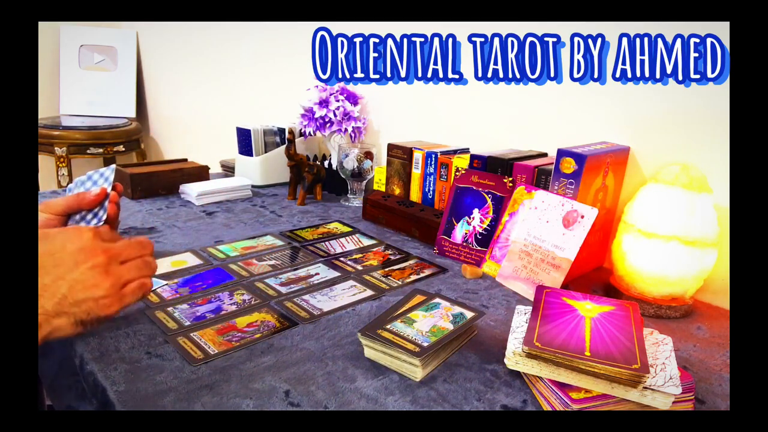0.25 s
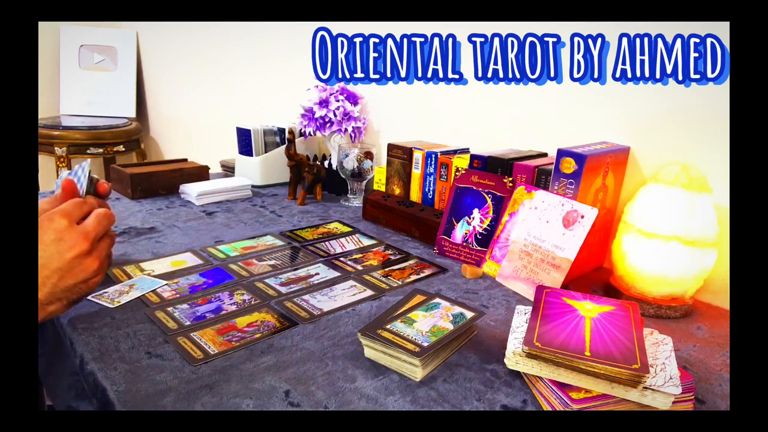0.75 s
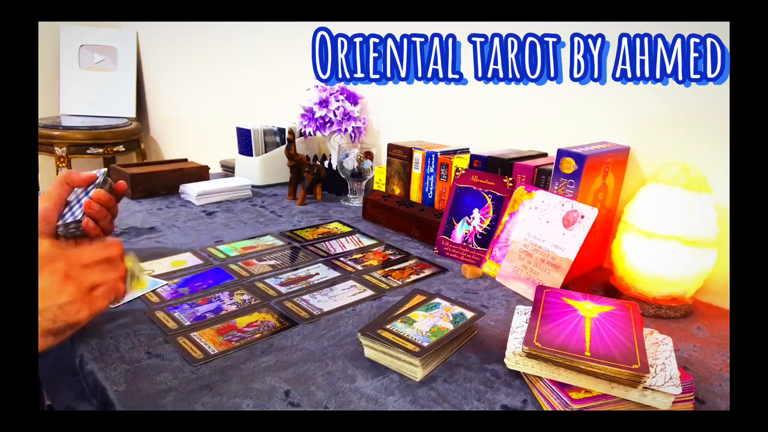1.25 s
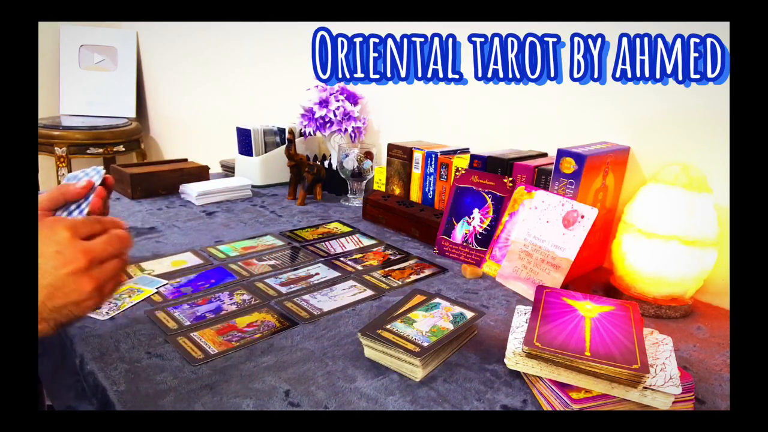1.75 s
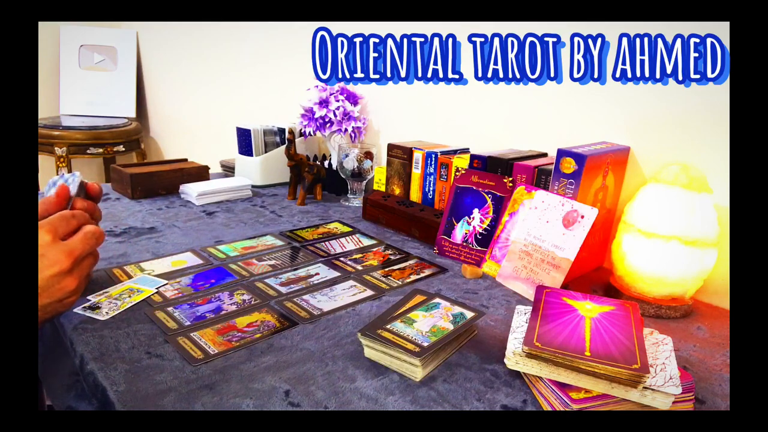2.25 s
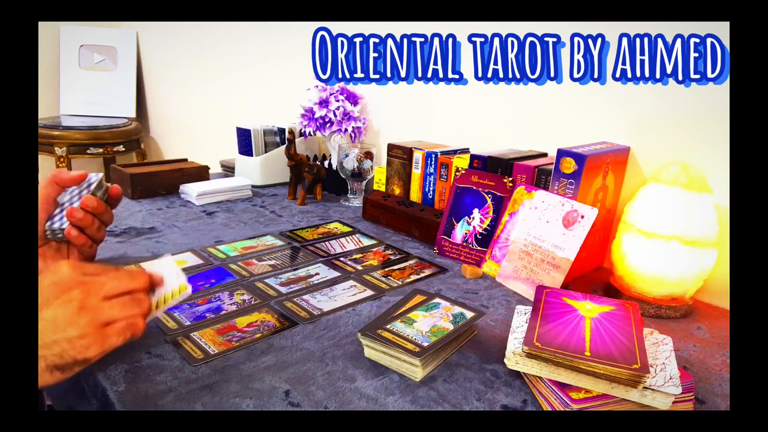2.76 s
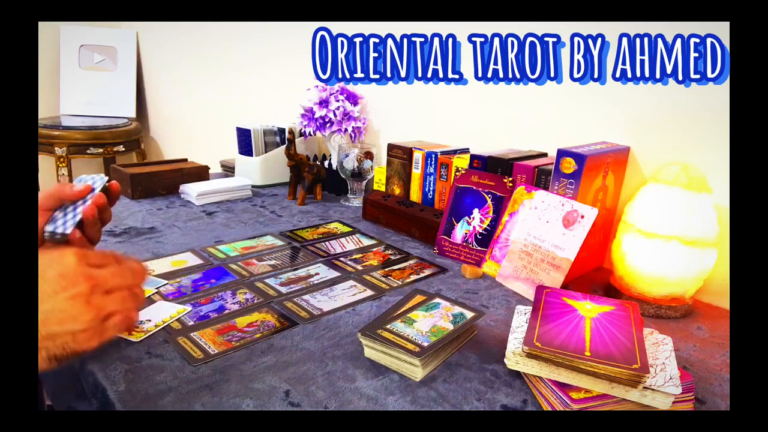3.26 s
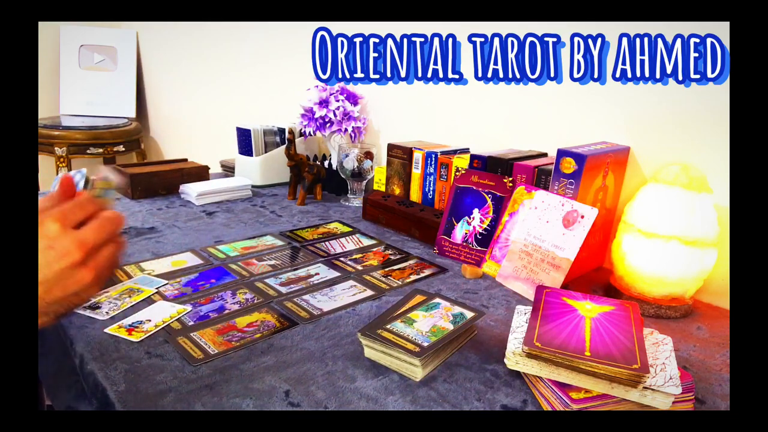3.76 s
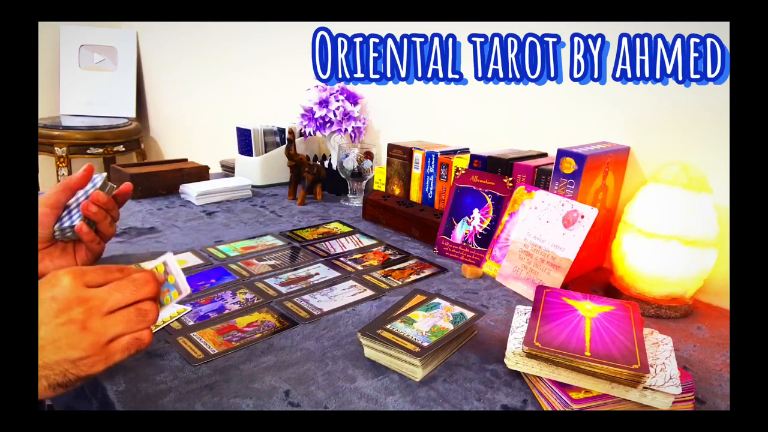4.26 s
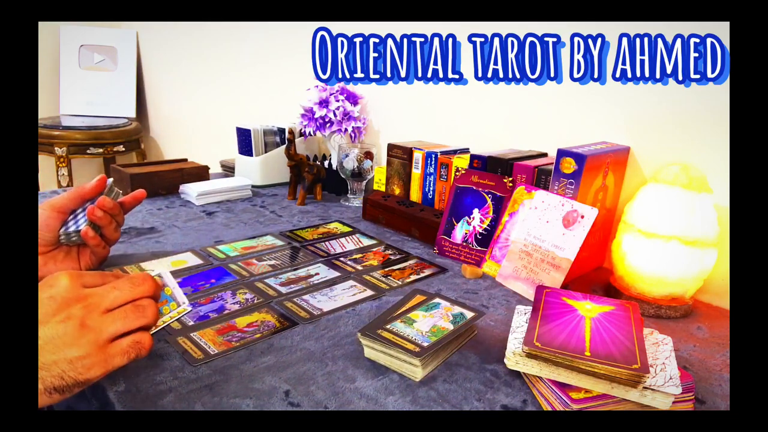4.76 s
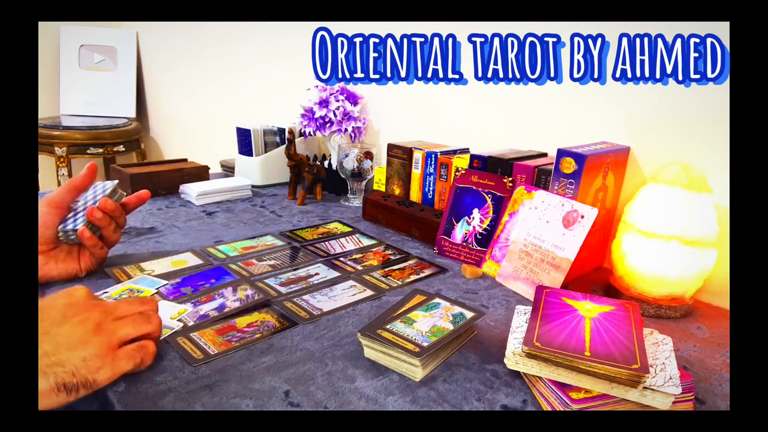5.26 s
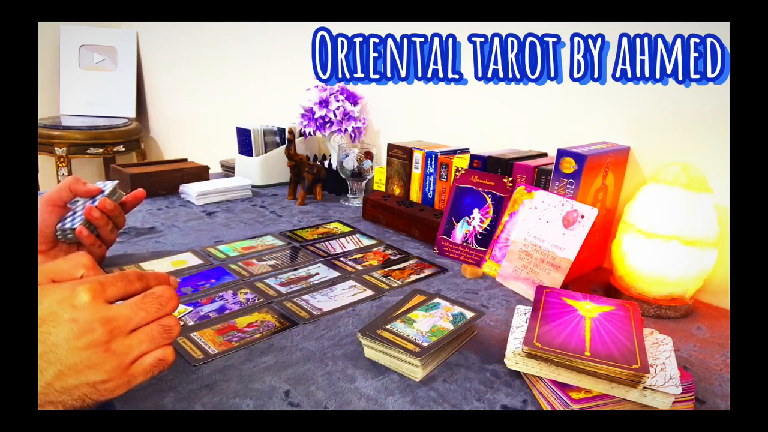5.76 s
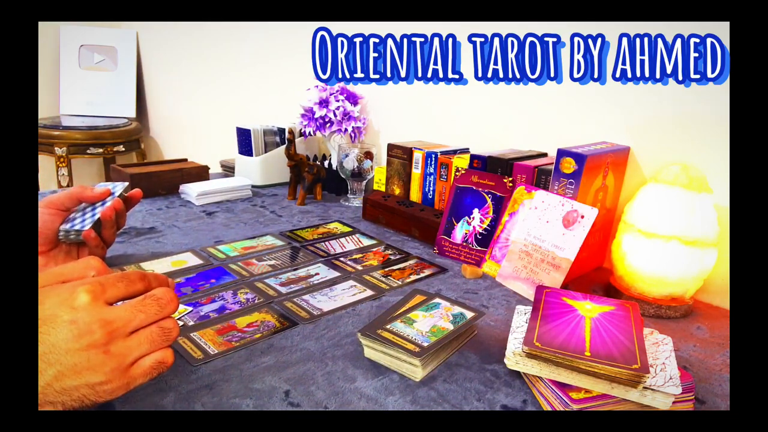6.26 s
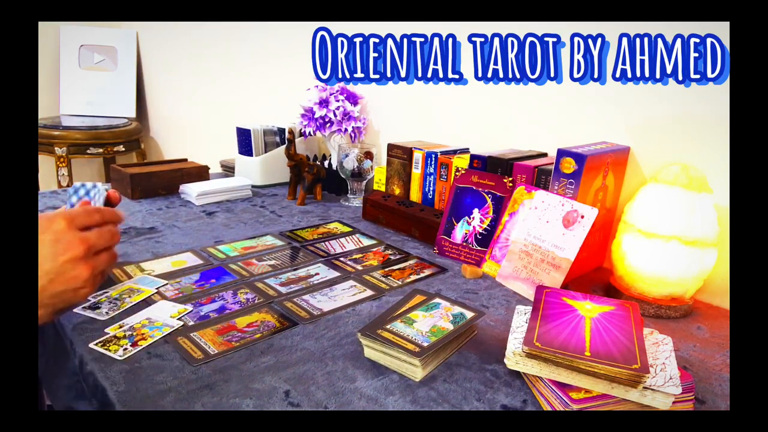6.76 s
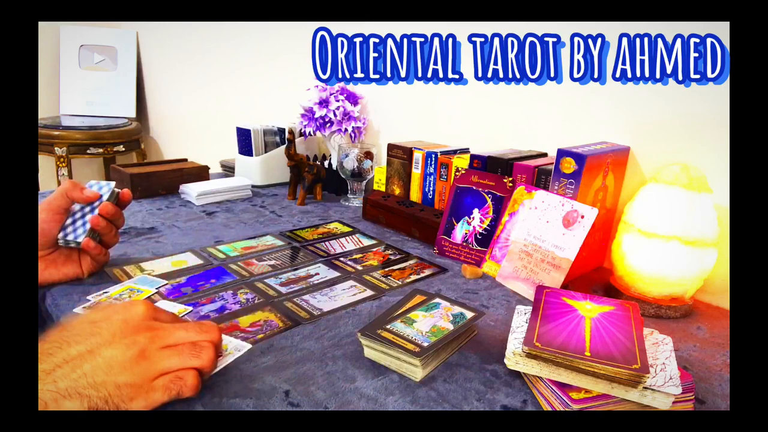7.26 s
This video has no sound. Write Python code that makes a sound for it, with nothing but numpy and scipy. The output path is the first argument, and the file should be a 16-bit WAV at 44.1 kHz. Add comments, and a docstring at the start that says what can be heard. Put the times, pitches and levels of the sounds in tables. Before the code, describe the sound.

In a bare, quiet room, a close microphone picks up cards being dealt at an unhurried pace. Three cards rub and snap off the deck and click down on the table. Before the third lands, a fingernail taps lightly several times. Tiny edge squeaks follow, then a last quick draw and placement. Each snap leaves a short echo above a faint hiss and soft low thuds from the table.

```python
"""A cloth-covered table in a bare, quiet room: tarot cards are drawn from a hand-held deck and laid down.
Each card rubs along the pack, snaps free with a puff of air, and is pressed down with a second snap.
Corners flick, edges chirp as they catch, a fingernail taps, and the table rumbles under a leaning arm.
The room rings after every snap, over a faint steady hiss."""
import sys
import numpy as np
from scipy import signal
from scipy.fft import rfft, irfft
from scipy.io import wavfile
from scipy.ndimage import uniform_filter1d

SR = 44100
rng = np.random.default_rng(int(sys.argv[2]) if len(sys.argv) > 2 else 0)


def wrap_up_sound(samples):
    """Save the sound to the file named by the first command line argument, as 16-bit audio."""
    columns = np.atleast_2d(samples).T
    # keep every value between -1 and 1, then stretch to whole-number steps
    tamed = np.clip(columns, -1, 1)
    steps = np.round(tamed * 32767).astype(np.int16)
    wavfile.write(sys.argv[1], SR, steps)


N = 331632
SIZE = 4096  # samples per contact
PRE_ROLL_S = SIZE / 4 / SR  # buffer start to release
TIME_S = np.arange(N) / SR
BIN_HZ = np.maximum(np.arange(SIZE // 2 + 1) * SR / SIZE, 1)


def undb(db):
    """Decibels to gain."""
    return 10 ** (np.asarray(db) / 20)

def unit(x):
    """Scale to rms 1."""
    return x / np.sqrt(np.mean(x ** 2))

def along(hz, points):
    """Interpolate (Hz, value) points over log frequency."""
    point_hz, value = np.transpose(points)
    return np.interp(np.log(np.maximum(hz, 1)), np.log(point_hz), value)

def tint(x, points):
    """Filter a track by (Hz, dB) points; rms 1."""
    hz = np.arange(N // 2 + 1) * SR / N
    return unit(irfft(rfft(x) * undb(along(hz, points)), N))

def add(track, s, x):
    """Mix x in from time s."""
    i = max(int(s * SR), 0)
    track[i:i + len(x)] += x[:max(N - i, 0)]

def swell(s, rise_s, fall_s):
    """Two-sided Gaussian envelope peaking at s."""
    return np.exp(-.5 * ((TIME_S - s) / np.where(TIME_S < s, rise_s, fall_s)) ** 2)

def bell(hz, width_hz):
    """Gaussian resonance, peak 1."""
    return np.exp(-.5 * ((BIN_HZ - hz) / width_hz) ** 2)

def hump(hz, octaves):
    """Broad rise around a bending card's pitch, peak 1."""
    return np.exp(-.5 * (np.log2(BIN_HZ / hz) / octaves) ** 2)

def colour_db(resonances):
    """Spectrum of (Hz, width Hz, dB) resonances."""
    return sum(db * bell(hz, width_hz) for hz, width_hz, db in resonances)

def grip_db(grip):
    """Spectrum of a held card's (Hz, dB) peaks and hollows; higher ones are wider."""
    return sum(db * bell(hz, 100 + 0.047 * hz) for hz, db in grip)

def low_cut_db(hz):
    """First-order bass roll-off."""
    return -10 * np.log10(1 + (hz / BIN_HZ) ** 2)

def below(hz):
    """Power share on the low side of a crossover."""
    return 1 / (1 + (BIN_HZ / hz) ** 4)

def ring(push, db):
    """Drive a minimum-phase body of gain db per bin."""
    cepstrum = irfft(db * np.log(10) / 20)
    cepstrum[1:SIZE // 2] *= 2
    cepstrum[SIZE // 2 + 1:] = 0
    return irfft(np.exp(rfft(cepstrum)) * rfft(push))

def scuff(rise_ms, fall_ms, release, smooth_bins=11):
    """Tiny slips crowd up to one larger release and die away; spectrum flattened."""
    ms = (np.arange(SIZE) - SIZE // 4) * 1000 / SR
    envelope = np.exp(-np.where(ms < 0, .5 * (ms / rise_ms) ** 2, ms / fall_ms))
    slips = rng.standard_normal(SIZE) * envelope
    slips = slips / np.linalg.norm(slips) + release * (ms == 0)
    power = uniform_filter1d(np.abs(rfft(slips)) ** 2, smooth_bins)
    return ring(slips, -10 * np.log10(power + 0.0047))

# contact band centres: (thud, body, crack, edge, fizz) [Hz]
BAND_HZ = [170, 600, 1900, 5500, 13000]
def contact_db(bands_db, level_db, tilt_db_oct, pivot_hz=1900):
    """Spectrum of a contact; sharper ones tilt towards the treble."""
    tilted_db = bands_db + tilt_db_oct * np.log2(np.array(BAND_HZ) / pivot_hz)
    return along(BIN_HZ, list(zip(BAND_HZ, tilted_db))) + level_db


# background spectrum: (frequency [Hz], gain [dB])
FLOOR_SPECTRUM = [(100, -37.5), (170, -6), (392, -14.5), (643, -20), (1050, -24), (2950, -29.5),
                  (16000, -36)]
def noise_floor(level_db=-60.5):
    """Faint steady hiss, strongest in the bass."""
    return undb(level_db) * tint(rng.standard_normal(N), FLOOR_SPECTRUM)

# broad table resonances: (frequency [Hz], gain [dB])
TABLE_SPECTRUM = [(15, -4), (33, -4.5), (47, 10.5), (62, -7.5), (78, 3), (100, -14.5), (128, -4),
                  (170, -20), (300, -20), (700, -58.5)]
# arm leaning on the table: (peak time [s], rise [s], fall [s], level [dB])
LEANS = [(1.649, 0.32, 0.92, -43.5), (5.1, 0.2, 0.27, -52.5), (7.3, 0.26, 0.36, -54)]
def table_rumble(rest_db=-49.5):
    """The table booms under the hands, louder as the arm leans."""
    weight = undb(rest_db) + sum(undb(db) * swell(s, rise_s, fall_s) for s, rise_s, fall_s, db in LEANS)
    return tint(rng.standard_normal(N), TABLE_SPECTRUM) * weight

# card corner resonances: (centre [Hz], width [Hz], gain [dB])
CORNER_RESONANCES = [(481, 46, 7), (870, 200, -3), (4000, 1360, -8), (10600, 1400, -9.5)]
def tick(db):
    """A sharp contact rings the card for a millisecond or two."""
    push = scuff(rise_ms=0.01, fall_ms=1.0, release=0.29, smooth_bins=51)
    return ring(push, db + colour_db(CORNER_RESONANCES) + low_cut_db(120))

# cards and cupped hand, close by: (centre [Hz], width [Hz], gain [dB])
CARD_RESONANCES = [(2140, 700, 5), (2920, 390, -6), (7370, 760, 6.5), (13400, 820, 4.5)]
# fingers cupping a corner: (centre [Hz], width [Hz], gain [dB])
FINGER_RESONANCES = [(5730, 340, 4)]
# flick spectrum: (thud, body, crack, edge, fizz) [dB]
FLICK_BANDS_DB = [-3.5, -8.5, -14, -18, -28]
# corner flicks: (time [s], level [dB], tilt [dB/oct], pitch [Hz], grip peaks [(Hz, dB)])
FLICKS = [ (0.022, -7, -2, 1420, []), (0.628, -10, 0, 6260, []), (1.3204, 10.5, 3.5, 960, [(2450, 7.5)]),
          (1.9157, -12, 0, 5770, []), (2.8940, 6, -0.5, 1770, [(450, -7), (1080, 2.5)]),
          (3.634, 2.5, 0, 6000, []), (3.6562, -8, 0.5, 3290, []), (5.128, -6.5, 1, 5280, [(2000, 11.5)]),
          (5.2420, -8, 3, 1303, []), (5.2570, -7, 1.5, 1296, []), (6.735, -9.5, -1.5, 1480, []),
          (6.8449, 6.5, -0.7, 5600, [(3000, -28), (4650, 12), (11200, 19.5)]),
          (7.217, 1, 1, 2830, [(1300, 9.5), (3800, -12), (7900, 7)]), (7.2347, -1, -3.5, 800, [])]
def corner_flicks():
    """A corner bends past a finger and ticks."""
    out = np.zeros(N)
    for s, level_db, tilt_db_oct, hz, grip in FLICKS:
        pitch_db = 7 * hump(hz, octaves=0.69) + 4 * bell(hz, 0.059 * hz)
        hand_db = colour_db(FINGER_RESONANCES) + 0.31 * colour_db(CARD_RESONANCES) + grip_db(grip)
        db = contact_db(FLICK_BANDS_DB, level_db, tilt_db_oct) + pitch_db + hand_db
        add(out, s - PRE_ROLL_S, tick(db))
    return out

def friction(spectrum, grain_db, snags_per_s=200, snag_db=-8.5, spread_db=2.5):
    """Paper fibres catch and let go: dense uneven slips, sparse clicks of a snagging edge."""
    catches = np.repeat(rng.standard_normal(N // 32 + 1), 32)[:N]
    slips = unit(rng.standard_normal(N) * undb(grain_db * catches))
    snagged = rng.random(N) < snags_per_s / SR
    snags = unit(snagged * undb(-spread_db * rng.uniform(-1, 1, N)))
    return tint(slips + undb(snag_db) * snags, spectrum)

def snap_strokes(follow=0.66):
    """Rubs leading into each snap, as SLIDES rows; release and scrape follow its level."""
    rows = []
    for s, level_db, *_, thumb_s, pull_s, pull_db, _ in DRAWS:
        thumb = (s - thumb_s, 0.28 * thumb_s, 0.45 * thumb_s, -65, -67)
        pull = (s - 0.58 * pull_s, 0.18 * pull_s, 0.058 * pull_s, pull_db, pull_db - 2)
        release = (s - 0.0017, 0.0073, 0.0055, -44 + follow * level_db, -41 + follow * level_db)
        rows += [thumb, pull, release]
    for s, level_db, rise_ms, *_ in DRAWS + LAYS:
        scrape_db = -62 + follow * level_db
        scrape_rise_s = 0.033 * rise_ms  # slower snap, longer scrape
        rows.append((s - 0.0026, scrape_rise_s, 0.02, scrape_db, scrape_db + 2.5))
    return rows

# rubs on pack or cloth: (peak time [s], rise [s], fall [s], hiss [dB], rasp [dB])
SLIDES = [(0.107, 0.0038, 0.0044, -59, -58), (0.859, 0.011, 0.0068, -38, -45),
          (1.425, 0.007, 0.0064, -52, -70), (2.277, 0.015, 0.023, -61.5, -59),
          (2.398, 0.021, 0.038, -50.5, -60), (3.044, 0.0035, 0.008, -55, -62.5),
          (3.355, 0.031, 0.023, -61.5, -59.5), (3.57, 0.043, 0.027, -66, -68.5),
          (5.288, 0.024, 0.018, -64, -65), (6.868, 0.011, 0.017, -58, -64),
          (7.268, 0.0094, 0.016, -55, -43.5), (7.470, 0.082, 0.073, -62, -59)]
def card_slides(pressure_db=2.0):
    """Card faces hiss and edges rasp under uneven finger pressure."""
    hiss = friction([(1500, -32), (3100, -13.5), (4300, -2), (5800, 1), (7500, -3.5), (10000, -10.5),
                     (13500, -9), (16000, -24)], grain_db=-1)
    rasp = friction([(100, -8), (400, -3), (1100, -2.5), (2000, -2.5), (3000, -13), (6000, -20.5)],
                    grain_db=2)
    out = np.zeros(N)
    for s, rise_s, fall_s, hiss_db, rasp_db in SLIDES + snap_strokes():
        out += swell(s, rise_s, fall_s) * (undb(hiss_db) * hiss + undb(rasp_db) * rasp)
    pressure = unit(uniform_filter1d(rng.standard_normal(N), 400))
    return out * undb(pressure_db * pressure)

def reflection_db(delay_ms, echo_db=-11):
    """An echo off a hand or the table combs the spectrum."""
    echo = undb(echo_db) * np.exp(-2j * np.pi * BIN_HZ * delay_ms / 1000)
    return 20 * np.log10(np.abs(1 + echo))

def snap(db, grip, echo_ms, rise_ms, lag_s, flap_ms, room_db):
    """The edge scrapes free, fizzes as it lets go, and the card flaps back; returns (near, room feed)."""
    db = db + low_cut_db(70)
    near_db = db + grip_db(grip) + colour_db(CARD_RESONANCES) + reflection_db(echo_ms)
    feed_db = db + room_db + 0.77 * grip_db(grip)  # all directions mix: shallower peaks
    low, dull = below(1600), below(6500)
    scrape, fizz = (1 - low) * dull, 1 - dull
    out = np.zeros((2, SIZE))
    for track, gain_db in zip(out, (near_db, feed_db)):
        for share, ms in ((scrape, rise_ms), (fizz, 0.47 * rise_ms)):
            slips = scuff(ms, fall_ms=0.69, release=0.52, smooth_bins=35)
            track += ring(slips, gain_db + 10 * np.log10(share + 1e-4))
        flap = ring(scuff(0.8, flap_ms, release=0.52), gain_db + 10 * np.log10(low + 1e-4))
        track += np.roll(flap, int(lag_s * SR))
    return out

# lay spectrum: (thud, body, crack, edge, fizz) [dB]
LAY_BANDS_DB = [9, 0, -10, -10, -19.5]
# cards laid: (time [s], level [dB], rise [ms], tilt [dB/oct], flap pitch [Hz], echo delay [ms],
# grip peaks [(Hz, dB)])
LAYS = [ (0.114, 4, 2.9, -0.73, 530, 0.76, [(1280, 5.5), (2750, 10.5), (5500, 7.5), (6100, -5.5)]),
        (1.4331, 0, 2.8, -0.28, 1170, 1.17, [(380, 5.5), (6900, 13), (8300, 4)]),
        (3.0510, 1.9, 1.1, -0.38, 5920, 0.645, [(460, 4), (800, -14), (3300, -9), (5700, 12.5), (7700, 9),
        (10500, 8)]), (5.302, -2, 2.1, 0.76, 1490, 0.67, [(420, 6.5), (2100, 3), (4200, 8.5), (7900, 4.5)]),
        (7.281, -2.5, 4.1, -0.98, 1320, 1.03, [(1350, 5), (2950, 5.5), (4100, -15)])]
def card_lays(flap_db=3.5):
    """A pressed corner snaps onto the cloth, farther off than the deck; returns (near, room feed)."""
    near, feed = np.zeros((2, N))
    for s, level_db, rise_ms, tilt_db_oct, hz, echo_ms, grip in LAYS:
        db = contact_db(LAY_BANDS_DB, level_db, tilt_db_oct) + flap_db * hump(hz, octaves=0.9)
        direct, spread = snap(db, grip, echo_ms, rise_ms, lag_s=0.00061, flap_ms=5, room_db=-2)
        add(near, s - PRE_ROLL_S, direct)
        add(feed, s - PRE_ROLL_S, spread)
    return near, feed

def stray_edges(per_draw=5):
    """Edges tick under the thumb as it pushes a card out."""
    out = np.zeros(N)
    for s, *_, thumb_s, _, _, _ in DRAWS:
        for when, strength in rng.standard_normal((per_draw, 2)):
            tick_s = s - thumb_s * (1 - 0.15 * when)
            db = contact_db(FLICK_BANDS_DB, level_db=-20 + 2 * strength, tilt_db_oct=-0.7)
            add(out, tick_s - PRE_ROLL_S, tick(db))
    return out

# draw spectrum: (thud, body, crack, edge, fizz) [dB]
DRAW_BANDS_DB = [14.5, 13, 4, 2, -6]
# cards drawn: (time [s], level [dB], rise [ms], tilt [dB/oct], flap pitch [Hz], flap lag [s],
# flap fall [ms], puff [dB], echo delay [ms], thumb lead [s], pull length [s], pull [dB],
# grip peaks [(Hz, dB)])
DRAWS = [ (0.8935, 1.6, 2.2, -0.081, 317, 0.0046, 5.4, -8.5, 0.9, 0.32, 0.099, -49, [(1030, 0.5),
         (2250, 2.5), (2750, -2), (5550, -4), (8100, -13)]),
         (2.4897, 3, 1.28, 0.79, 624, 0.0011, 3.9, -2.5, 0.555, 0.48, 0.23, -53.5, [(620, 6), (1000, -12),
         (2300, 8.5), (3000, -10), (3700, 9), (4900, 7.5)]),
         (3.78, 4.5, 1.77, -1.4, 1472, 0.001736, 2.5, -14.5, 0.555, 0.22, 0.091, -42.5, [(680, 7),
         (2650, 5.5), (3100, 4), (3950, -11.5), (7100, 6.5), (11800, -20)]),
         (6.9454, -4.5, 2.2, 1, 3240, 0.0014, 3.1, -17.5, 0.85, 0.29, 0.15, -59, [(270, 9), (1100, 3),
         (2450, 4), (3150, -6), (6700, 6)])]
def card_draws(flap_db=6.5, puff_hz=58, puff_s=0.0039):
    """A card snaps off the deck and flaps, shoving a puff of air; returns (near, room feed)."""
    near, feed = np.zeros((2, N))
    t = TIME_S[:SIZE]
    puff = np.sin(2 * np.pi * puff_hz * t) * np.exp(-t / puff_s)
    for s, level_db, rise_ms, tilt_db_oct, hz, lag_s, flap_ms, puff_db, echo_ms, *_, grip in DRAWS:
        db = contact_db(DRAW_BANDS_DB, level_db, tilt_db_oct) + flap_db * hump(hz, octaves=0.9)
        direct, spread = snap(db, grip, echo_ms, rise_ms, lag_s, flap_ms, room_db=-9)
        add(near, s - PRE_ROLL_S, direct)
        add(near, s - .001, undb(puff_db) * puff)
        add(feed, s - PRE_ROLL_S, spread)
    return near, feed

# catches on a card: (time [s], pitch [Hz], level [dB], relative overtone [dB])
CHIRPS = [(0.874, 1090, -9, -21), (2.354, 1080, -4.5, -18), (2.471, 1010, -2, -14), (5.789, 1990, -12, -22),
          (6.163, 1980, -7.5, -13.5), (6.217, 1900, -9, -13)]
def card_chirps(overtone_ratio=1.8, leak=0.025):
    """A fingertip or edge sticks and slips, driving a narrow resonance and its overtone."""
    out = np.zeros(N)
    for s, hz, db, overtone_db in CHIRPS:
        width_hz = 0.16 * hz
        gain = bell(hz, width_hz) + undb(overtone_db) * bell(overtone_ratio * hz, width_hz) + leak
        slips = scuff(rise_ms=2.5, fall_ms=9, release=0.093)
        add(out, s - PRE_ROLL_S, ring(slips, db + 20 * np.log10(gain)))
    return out

# soft low thuds: (peak time [s], rise [s], fall [s], pitch [Hz], level [dB])
THUDS = [(1.48, 0.1, 0.26, 120, -40.5), (1.72, 0.15, 0.051, 74.4, -33), (2.174, 0.01, 0.046, 264, -47),
         (6.966, 0.07, 0.064, 95, -44.5)]
def soft_thuds():
    """Soft low thuds: an arm on the table, and a slow puff of air after the last draw."""
    out = np.zeros(N)
    for s, rise_s, fall_s, hz, db in THUDS:
        spectrum = [(hz / 3, -12), (hz, 0), (1.4 * hz, -7), (1.7 * hz, -22), (20 * hz, -70)]
        out += undb(db) * swell(s, rise_s, fall_s) * tint(rng.standard_normal(N), spectrum)
    return out

# tap spectrum: (thud, body, crack, edge, fizz) [dB]
TAP_BANDS_DB = [-29, -7, -20, -24.5, -32]
# tapped card resonances: (centre [Hz], width [Hz], gain [dB])
TAP_RESONANCES = [(1200, 96, 6.8), (2730, 350, 12), (6640, 450, 8.1)]
# nail taps: (time [s], level [dB])
TAPS = [(4.209, -1.5), (4.265, -3.5), (4.673, 3), (4.7143, -1), (4.769, 2)]
def nail_taps():
    """A fingernail strikes a card lying on the table."""
    out = np.zeros(N)
    for s, level_db in TAPS:
        db = contact_db(TAP_BANDS_DB, level_db, tilt_db_oct=0) + colour_db(TAP_RESONANCES)
        add(out, s - PRE_ROLL_S, tick(db))
    return out

# room decay: (frequency [Hz], T60 [s])
ROOM_T60 = [(150, 1), (2500, 1), (6000, 0.72), (9500, 0.72), (15000, 0.36)]
def room(x, gap_s=0.00082, build_s=0.0054):
    """Diffuse echoes build after a short gap; the treble dies first."""
    t, hz = TIME_S[:SR], np.arange(SR // 2 + 1)
    noise = rfft(rng.standard_normal(SR))
    centres_hz = np.geomspace(100, 16000, 12)
    tail = np.zeros(SR)
    for centre_hz, share in zip(centres_hz, np.eye(len(centres_hz))):
        band = irfft(noise * along(hz, list(zip(centres_hz, share))), SR)
        tail += band * np.exp(-np.log(1000) * t / along(centre_hz, ROOM_T60))
    tail *= 1 - np.exp(-np.maximum(t - gap_s, 0) / build_s)
    return signal.fftconvolve(x, tail / np.linalg.norm(tail))[:N]

def scene():
    """Close cards, their room echo, hiss, table rumble and soft thuds; mono."""
    draws, draw_feed = card_draws()
    lays, lay_feed = card_lays()
    ticks = corner_flicks() + nail_taps() + stray_edges()
    slides, chirps = card_slides(), card_chirps()
    snap_feed = draw_feed + lay_feed
    echo = room(undb(-3.5) * snap_feed + undb(-11.5) * ticks + undb(-14.5) * slides + undb(-2) * chirps)
    cards = draws + lays + ticks + slides + chirps
    return (cards + echo + noise_floor() + table_rumble() + soft_thuds())[None]

def record(dry, ceiling=0.9, top_hz=15700):
    """The sharpest snaps clip; the microphone's top end cuts off steeply."""
    low_pass = signal.ellip(8, .2, 70, top_hz, fs=SR, output="sos")
    return signal.sosfilt(low_pass, np.clip(dry, -ceiling, ceiling))


dry = scene()
out = record(dry)
wrap_up_sound(out)
```